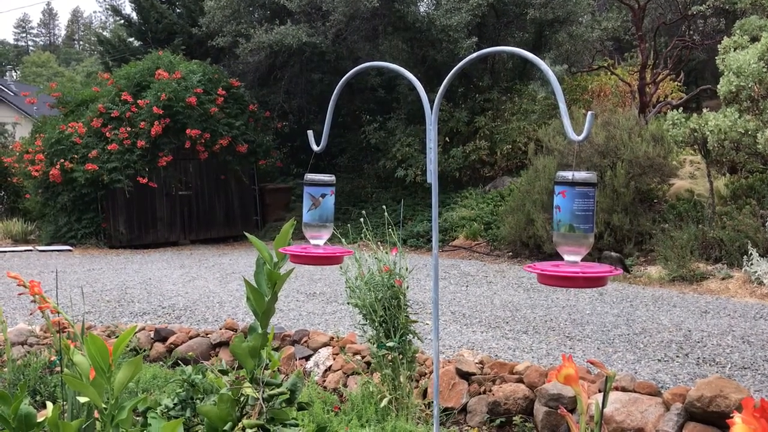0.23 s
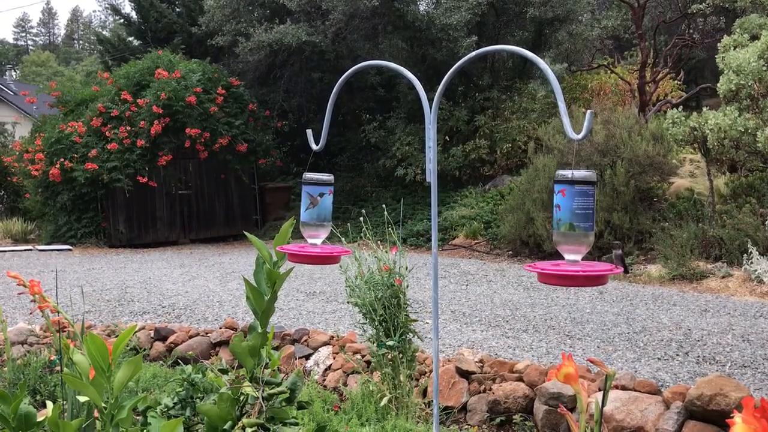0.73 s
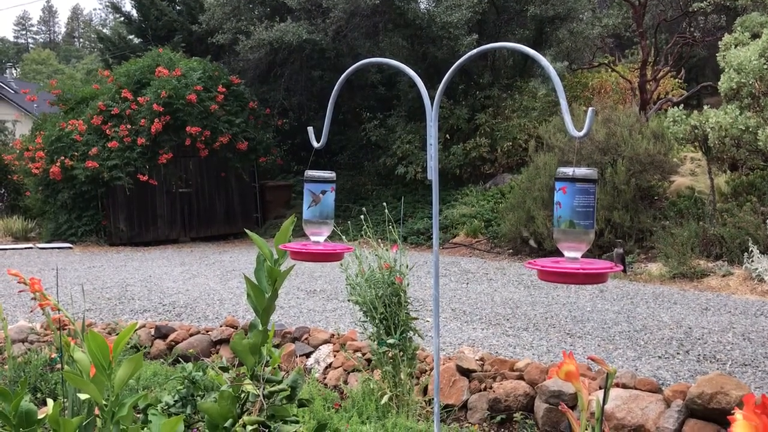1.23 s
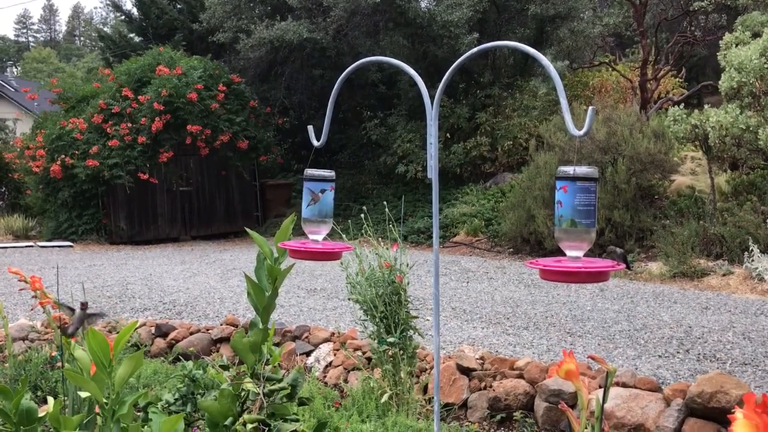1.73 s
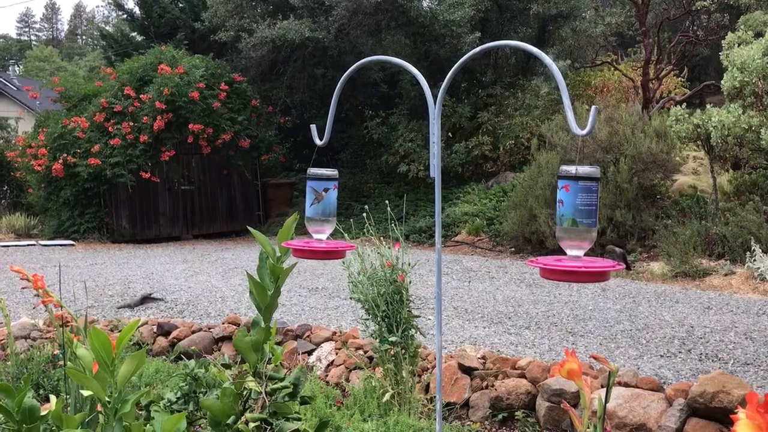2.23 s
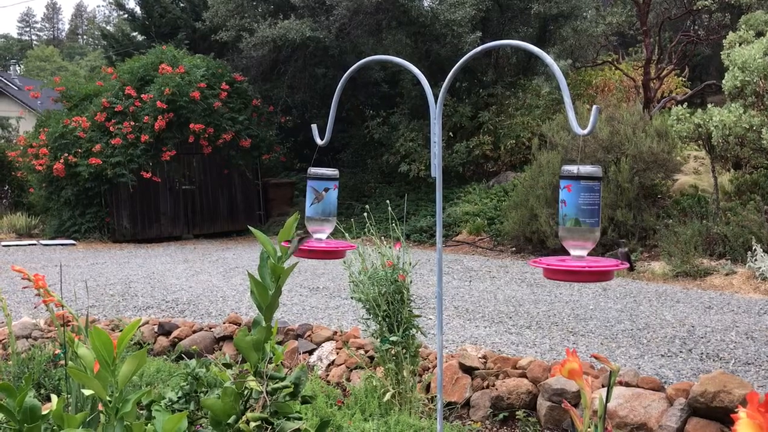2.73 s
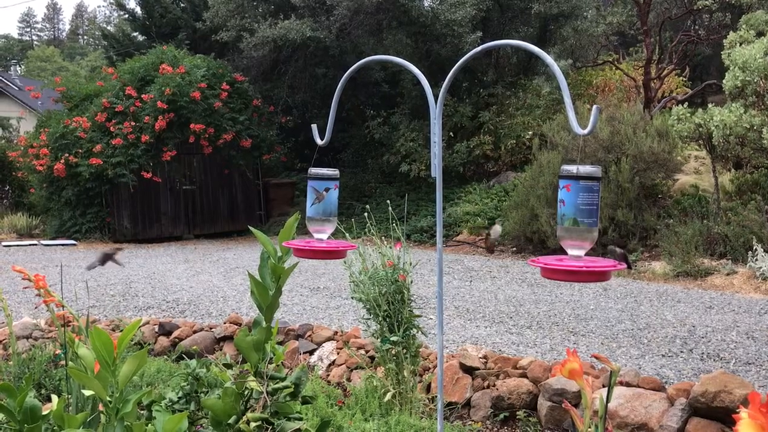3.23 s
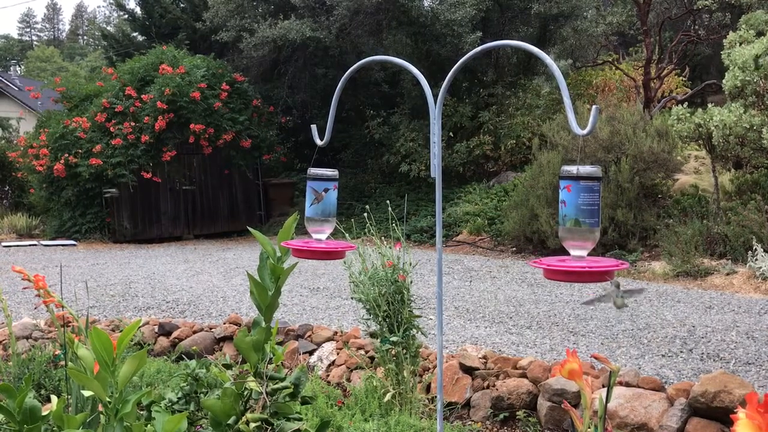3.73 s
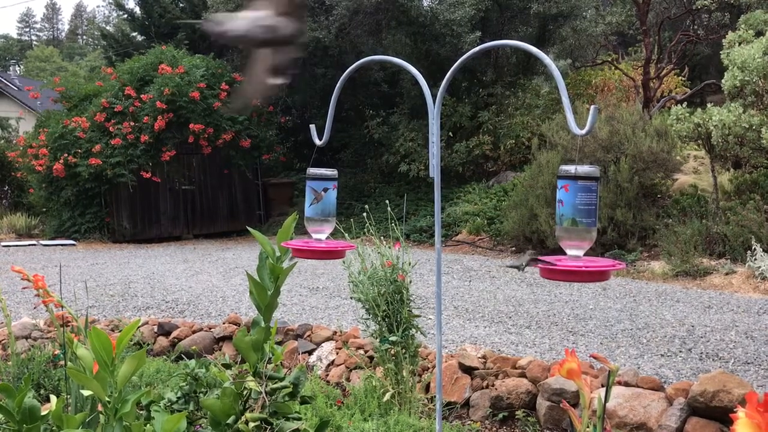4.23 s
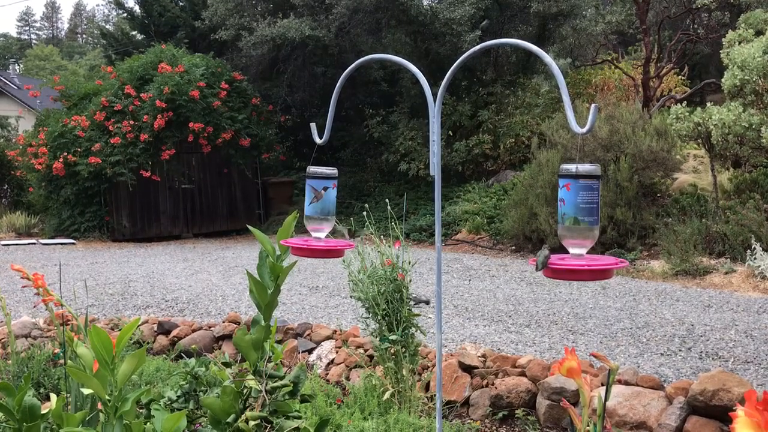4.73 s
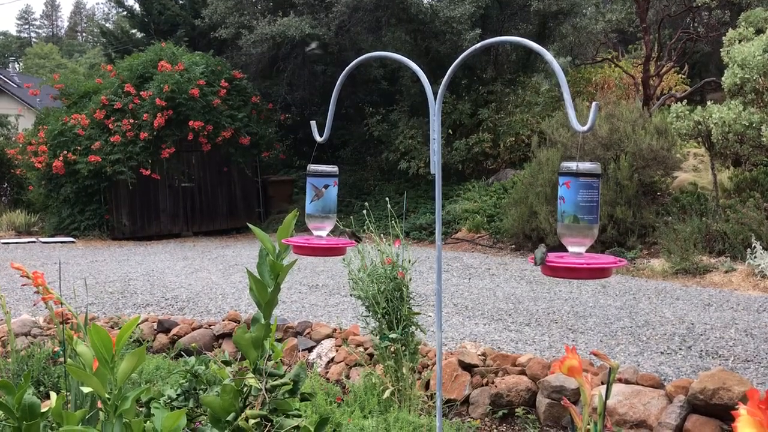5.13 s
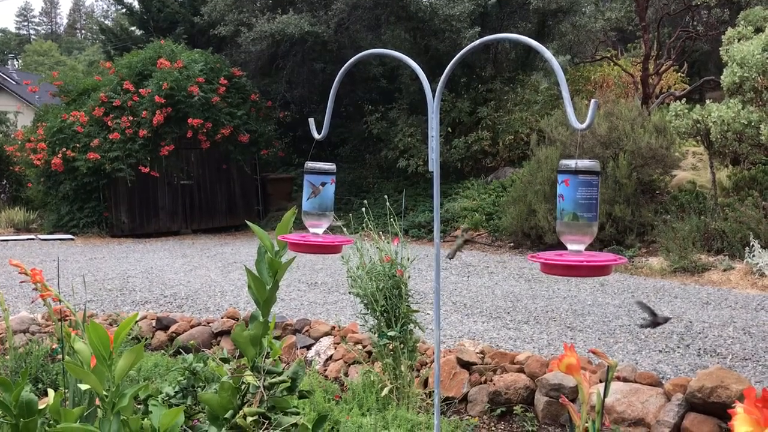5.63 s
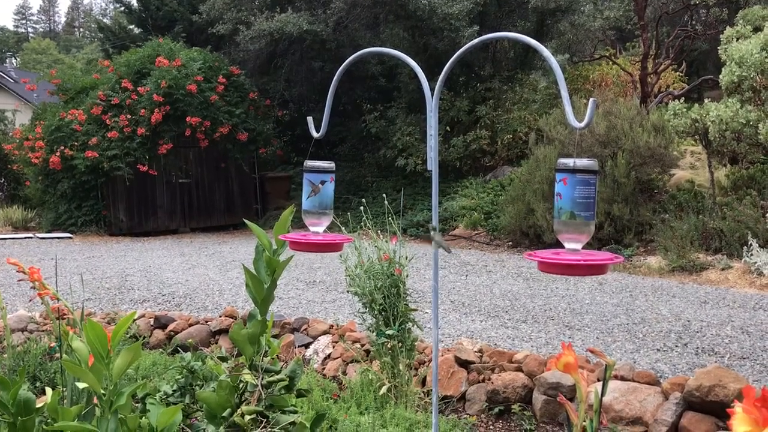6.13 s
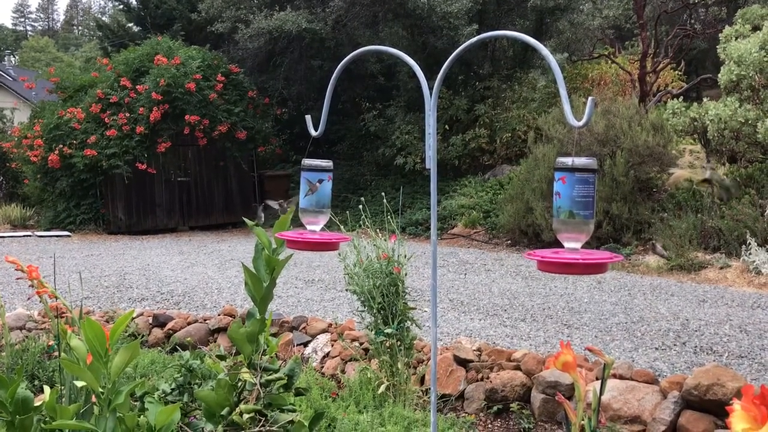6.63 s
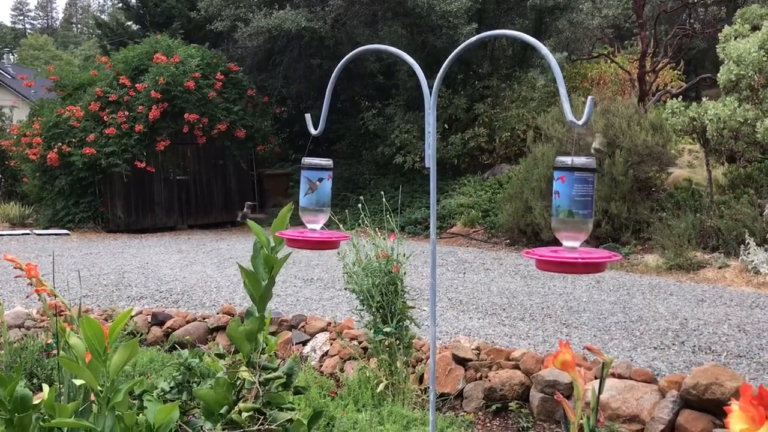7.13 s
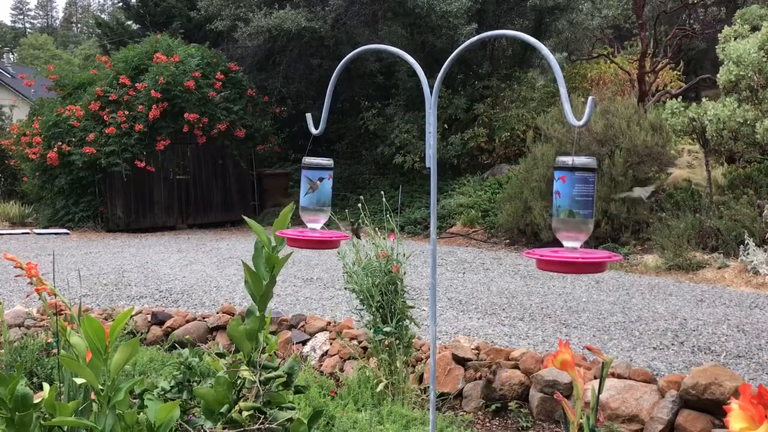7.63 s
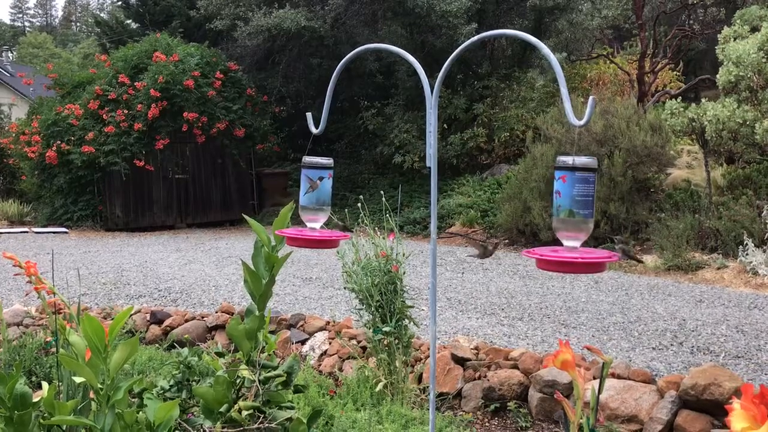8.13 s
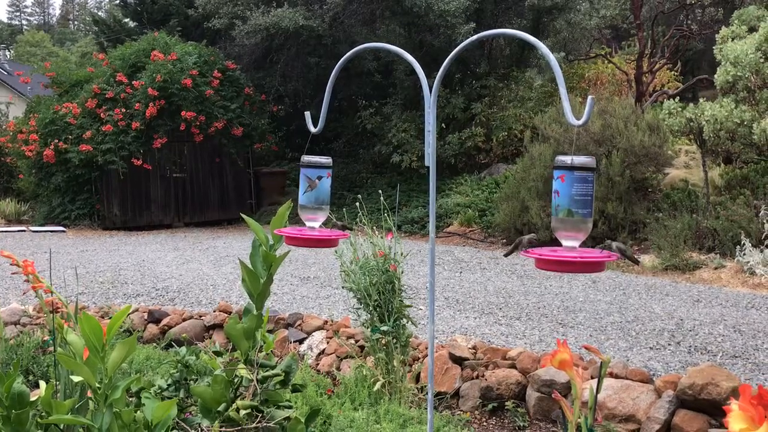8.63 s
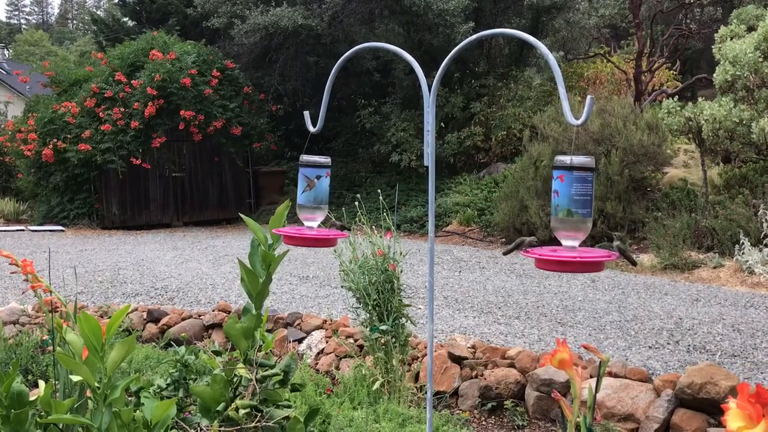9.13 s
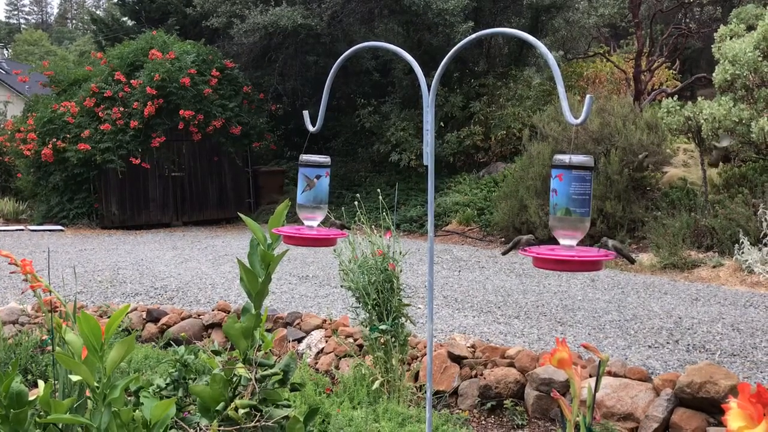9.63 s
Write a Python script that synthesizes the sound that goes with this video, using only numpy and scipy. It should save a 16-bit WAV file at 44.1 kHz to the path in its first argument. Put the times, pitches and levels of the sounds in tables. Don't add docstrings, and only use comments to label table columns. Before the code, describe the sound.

Low wing hum and soft garden air run throughout. A near hummingbird gives a quick series of thin whistles breaking into buzzy warbles, then a farther bird answers in rapid chatter. Wings whirr past closely, strongest just after four seconds, with a sharp chip near five. A rival calls, a bill clatters, and calling fades behind the hedge, leaving wings and a faint insect. Mono outdoor microphone near the feeder.

```python
import sys
import numpy as np
from scipy import signal
from scipy.fft import rfft, irfft, next_fast_len
from scipy.io import wavfile
from scipy.ndimage import map_coordinates

SR = 44100
rng = np.random.default_rng(int(sys.argv[2]) if len(sys.argv) > 2 else 0)


def generate_wav(sig):
    pcm = np.round(np.clip(np.atleast_2d(sig).T, -1, 1) * 32767).astype(np.int16)
    wavfile.write(sys.argv[1], SR, pcm)


def boost(x):
    u = np.asarray(x, float) / 20
    return 10 ** u


N = 436149

# sweeps/Hz, first top f/Hz, last top f/Hz, first bottom f/Hz, last bottom f/Hz,
# rising share/1, level at bottom/dB
FAR_WARBLE = (310, 9200, 7100, 5700, 4400, .58, -9)
# first at/ms, later per warble start/1, gap/ms, second to first bottom/1,
# whistle base f/Hz, whistle rise per bottom rise/1
FAR_DIP_HABIT = (4.0, .37, 30, .9, 8200, .5)


def unit(x):
    return x / np.sqrt(np.mean(x ** 2) + 1e-20)


def along(points, hz):
    f, v = np.transpose(points)
    return np.interp(np.log(hz + 1), np.log(f + 1), v)


def curves(rows):
    s, *cols = np.transpose(rows)
    return [np.interp(np.arange(N) / SR, s, c) for c in cols]


def wobble(rate_hz, size=N):
    knots = rng.standard_normal(size // 20 + 9)
    return map_coordinates(knots, [np.arange(size) * rate_hz / SR])


def filtered(x, response):
    m = next_fast_len(N + 8192)
    return irfft(rfft(x, m) * response(np.fft.rfftfreq(m, 1 / SR)), m)[..., :N]


def noise(spectrum):
    return unit(filtered(rng.standard_normal(N), lambda hz: boost(along(spectrum, hz))))


def add(track, s, sound):
    track[round(s * SR):][:len(sound)] += sound


def rise(t, at_s, soft_s):
    return .5 + .5 * np.tanh((t - at_s) / soft_s)


def garden_air():
    # f/Hz, density/dB
    air_spectrum = [(180, -18), (300, -6.5), (372, -8.5), (555, -10.5), (930, -8), (1010, -9), (1120, -9),
                    (2440, -12.5), (4990, -15), (6000, -18), (10400, -24.5), (14700, -23), (16000, -30)]
    return boost(-68.5) * noise(air_spectrum)


def insect():
    # t/s, level/dB
    insect_level = [
        (4.7, -110),
        (5.0, -84),
        (5.4, -89),
        (7.9, -82),
        (8.3, -91),
        (9.89, -86),
    ]
    level_db, = curves(insect_level)
    band = [(11900, -55), (12250, -12), (12400, -10), (12600, -1), (13000, -65.5)]
    return boost(level_db + 2.0 * wobble(30)) * noise(band)


def hedge(x, leaves_db):
    # f/Hz, t60/s
    hedge_t60 = [(2000, 0.24), (7000, 0.61), (9500, 0.53), (14000, 0.34)]
    hz, t, z = signal.stft(rng.standard_normal(SR // 2), SR, nperseg=256)
    fade = boost(-60 * t / along(hedge_t60, hz)[:, None])
    tail = signal.istft(z * fade, SR, nperseg=256)[1]
    tail *= 1 + boost(leaves_db - 60 * np.arange(len(tail)) / SR / 0.061)
    return signal.fftconvolve(np.pad(x, (60, 0)), tail / np.linalg.norm(tail))[:N]


def echoes(x, taps):
    return sum(boost(db) * np.pad(x, (round(s * SR), 0))[:N] for s, db in taps)


def wall(x):
    early = echoes(x, [(.0021, -22), (.0037, -15), (.0062, -22), (.0115, -22)])
    late = echoes(x, [(.067, -28), (.078, -31)])
    return early + filtered(late, lambda hz: 1 / (1 + (hz / 8600) ** 12))


def flight():
    # t/s, wing beat f/Hz, hum level/dB
    hovering = [(0, 40.7, -64), (1, 41.3, -64), (1.8, 47.3, -61), (2.5, 43.5, -64), (3.1, 39.3, -62.5),
                (3.9, 47.2, -58), (4.6, 40.4, -58), (5.1, 45.7, -58.5), (5.8, 38, -56.5), (6.4, 42.3, -59),
                (7.3, 42.2, -56.5), (7.75, 45, -59), (8.2, 43.5, -61), (8.6, 44, -64), (9.1, 40.2, -64),
                (9.6, 39.4, -67.5), (9.89, 47, -62.5)]
    # t of closest approach/s, hum level/dB, passing time/s, wing beat f/Hz, swish level/dB
    fly_bys = [(0.021, -61, 0.15, 34, -89), (.52, -60.5, 0.045, 42.7, -91), (1.332, -57, .08, 43, -74),
               (1.631, -54.5, 0.07, 43, -71), (3.5, -56, 0.1602, 42, -69.5),
               (3.63, -54.5, 0.083, 47.7, -67), (3.77, -50.5, 0.0998, 48.7, -61.5),
               (4.02, -47.5, 0.045, 46.3, -64), (4.161, -51, 0.073, 55, -61),
               (4.333, -42, 0.0616, 45.5, -58), (4.38, -45.5, 0.022, 42.6, -75),
               (4.87, -57, 0.097, 39, -78), (5.47, -55, 0.11, 41.5, -78), (5.62, -58, 0.0587, 50, -66.5),
               (6.301, -55, 0.066, 46, -73), (6.47, -57, 0.0503, 51, -67.5), (6.6, -60.5, 0.049, 47, -64),
               (6.71, -54, .1, 53, -67), (7.09, -53, 0.072, 44.3, -69), (7.85, -58, 0.047, 48, -73),
               (8.929, -54, 0.083, 43, -72.5), (9.31, -53.5, 0.064, 41.5, -72.5),
               (9.759, -54.5, 0.067, 51, -69)]
    beat_hz, hover_db = curves(hovering)
    s, hum_db, pass_s, pass_beat_hz, swish_db = np.transpose(fly_bys)[:, :, None]
    t = np.arange(0, N + 64, 64) / SR
    near = (1 + ((t - s) / pass_s) ** 2) ** -2.2

    def passing_sum(v):
        return np.interp(np.arange(N) / SR, t, (v * near).sum(0))

    hover_power = boost(2 * hover_db)
    power = hover_power + passing_sum(boost(2 * hum_db))
    beat_hz = (beat_hz * hover_power + passing_sum(pass_beat_hz * boost(2 * hum_db))) / power
    swish_power = boost(2 * (hover_db - 14.5)) + passing_sum(boost(2 * swish_db))
    return beat_hz, np.sqrt(power), np.sqrt(swish_power)


def wings():
    # multiple of the beat/1, level/dB
    beat_harmonics = [(1, -4), (2, 2), (3, -9), (4, -2.5), (5, -10), (6, -13), (7, -14.5), (8, -13),
                      (9, -15.5), (10, -24)]
    # f/Hz, density/dB
    draught_spectrum = [(15, -45.5), (25, -8.5), (86, -1.5), (189, -7), (223, -9), (344, -15), (700, -33),
                        (910, -78), (1540, -120)]
    feather_spectrum = [(300, -32), (600, -4), (1500, -9.0), (3000, -12.5), (6000, -13.5), (15000, -20.0)]
    beat_hz, strength, swish = flight()
    turn = 2 * np.pi * np.cumsum(beat_hz * (1 + 0.01446 * wobble(12))) / SR
    tone = sum(boost(db + 2.57 * wobble(8)) * np.sin(k * turn + rng.uniform(0, 3.83))
               for k, db in beat_harmonics)
    puffs = boost(3.34 * np.cos(2 * turn) + 2.3 * np.cos(turn))
    hum = boost(-1.5) * (strength / boost(-57.5)) ** 0.098 * unit(tone)
    hum += boost(-2.5) * unit(puffs * noise(draught_spectrum))
    feathers = unit(puffs * noise(feather_spectrum))
    return strength * boost(0.83 * wobble(7)) * hum + swish * feathers


def clicks():
    # t/s, peak level/dB, thump level/dB
    snaps = [(.737, -48.5, -22), (1.1383, -52, -20), (1.786, -50, -33), (3.617, -52.5, 5),
             (5.514, -48, -20), (6.31, -43, -29), (6.553, -50, 2), (6.6064, -56, 3), (6.6125, -30, -30),
             (6.617, -37, -15), (6.632, -52, -11), (6.657, -47, -10), (6.670, -46, -24), (6.677, -49, -17),
             (9.70, -62, -2)]
    out, t = np.zeros(N), np.arange(SR // 50) / SR
    for s, db, thump_db in snaps:
        snap = boost(-60 * t / 0.00072) * np.sin(2 * np.pi * 6800 * t)
        snap += boost(-16.5 - 60 * t / 0.017) * rng.standard_normal(len(t))
        thump = boost(thump_db - 60 * t / 0.0049) * np.sin(2 * np.pi * 1100 * t)
        add(out, s, boost(db + 6.5) * (snap + thump))
    return out


def syrinx(pitch_hz, second_db, third_db, rasp):
    # f/Hz, level/dB
    throat = [(1200, -8.5), (2500, -8.5), (4000, -6.5), (6000, 1.5), (9300, 0.5), (10600, 0), (12500, -4.5),
              (16000, -16)]
    turn = 2 * np.pi * np.cumsum(pitch_hz) / SR
    smear = rasp * wobble(1400, size=len(pitch_hz))
    out = 0
    for k, db in ((1, 0), (2, second_db), (3, third_db)):
        level = boost(db + along(throat, k * pitch_hz)) * (k * pitch_hz < SR / 2)
        out = out + level * np.sin(k * turn + (k - 1) * smear)
    return out


def chips():
    # t/s, level/dB, top f/Hz, length/ms
    falls = [
        (2.628, -48, 7500, 11.38),
        (4.989, -30, 7830, 14.1),
        (7.5772, -34.5, 7685, 14),
        (7.848, -32.5, 8500, 10.3),
        (8.251, -60, 8540, 16),
        (8.567, -41, 7800, 12.1),
    ]
    out, t = np.zeros(N), np.arange(SR // 40) / SR
    for s, db, hz, length_ms in falls:
        done = np.clip(t / (length_ms / 1000), 0, 1)
        pitch_hz = hz - (hz - 1250) * (np.clip(done - .2, 0, 1) / .8) ** 2.1
        shape = done ** 2.2 * (1 - done) ** 0.86
        add(out, s, boost(db + 13.0) * shape * syrinx(pitch_hz, second_db=-1.0, third_db=1, rasp=0.082))
    return out


def warble(t, start_s, end_s, habit, unsteady, sag, sag_s, peak=0.71, droop=1.4):
    rate_hz, top0, top1, low0, low1, rising, fall_db = habit
    size = len(t)
    done = np.clip((t - start_s) / max(end_s - start_s, 1e-3), 0, 1)
    sagging = rise(t, end_s - sag_s, 0.00162)
    speed_hz = rate_hz * (1 + unsteady * wobble(146.3, size)) * (1 - 0.279 * sagging)
    cycle = (rising + np.cumsum(speed_hz * (t > start_s)) / SR) % 1
    swing = np.where(cycle < rising, cycle / rising, 1 + (cycle - rising) / (1 - rising))
    low_hz = low0 + (low1 - low0) * done
    top_hz = top0 + (top1 - top0) * done ** droop
    pitch_hz = low_hz + (top_hz - low_hz) * np.abs(np.sin(np.pi * swing / 2)) ** 1.4
    pitch_hz *= 1 + 0.0252 * wobble(498.4, size)
    pitch_hz *= 1 - sag * sagging * (.9 + 0.338 * np.tanh(wobble(900, size)))
    push = .5 + .5 * np.cos(2 * np.pi * (cycle - peak * rising))
    gain_db = fall_db * (1 - push) * (1 - 0.66 * sagging) - 4.5 * sagging
    return pitch_hz, boost(gain_db + 1.13 * wobble(598.0, size))


def bursts(table, rate_hz, ratios, rising, fall_db, swell_db, second_db, sag, peak, droop=1.4, hiss_db=-14):
    out, t = np.zeros(N), np.arange(SR // 10) / SR
    for s, db, hz, length_ms in table:
        end_s = length_ms / 1000 + 0.0023
        habit = (rate_hz, *(hz * np.array(ratios)), rising, fall_db)
        own_sag = sag * np.interp(hz, [5900, 6200], [1, .45])
        pitch_hz, gain = warble(t, 0, end_s, habit, unsteady=0.0318, sag=own_sag, sag_s=0.0072,
                                peak=peak, droop=droop)
        shape = boost(db + 10.5 - swell_db * np.clip(1 - t / end_s, 0, 1))
        shape *= rise(t, 0.0014, .0005) * (1 - rise(t, end_s, 0.0017))
        add(out, s, shape * gain * syrinx(pitch_hz, second_db, second_db + 4, rasp=2.37))
        puff = np.exp(-((t - end_s + .0045) / 0.0025) ** 2)
        puff += 0.33 * np.exp(-((t - .001) / .0007) ** 2)
        add(out, s, boost(db + hiss_db) * puff * np.diff(rng.standard_normal(len(t) + 1)))
    return out


def rattles():
    # t/s, level/dB, top f/Hz, length/ms
    slow = [(4.245, -70, 6600, 116), (6.882, -66.5, 7000, 39), (8.55, -68, 6970, 63.4),
            (3.588, -45, 7500, 59), (3.697, -46.5, 7490, 23), (3.8545, -42.5, 7830, 66),
            (3.943, -48.5, 7390, 61), (5.577, -55, 6053, 37), (6.308, -59.5, 6440, 20.8),
            (6.476, -58.5, 6560, 56)]
    return bursts(slow, 164, (0.84, 0.96, 0.18, .25), rising=0.44, fall_db=-22, swell_db=9,
                  second_db=-3.5, sag=0.093, peak=0.59)


def trills():
    # t/s, level/dB, f/Hz, length/ms
    near_trills = [
        (1.3633, -49, 5700, 24),
        (1.5293, -42.5, 5690, 26.2),
        (1.7019, -42.5, 5590, 24.4),
        (1.8866, -44.5, 5725, 18.5),
                   (3.426, -53, 5520, 25),
    ]
    return bursts(near_trills, 345, (1.03, 1.2, 0.96, 0.88), droop=0.59, hiss_db=-7.0,
                  rising=0.49, fall_db=-14, swell_db=8, second_db=-5.0, sag=.54, peak=0.78)


def calls(table, habit, crest_hz, slide, second_db, droop, warble_db, opening_db=0, peak=0.48, end_db=5.5,
          dull_db=-2.0):
    out, t = np.zeros(N), np.arange(SR // 10) / SR
    size = len(t)
    for s, db, hz, start_ms, length_ms, drops in table:
        start_s, end_s = start_ms / 1000, length_ms / 1000 + 0.00515
        dips = [(at_ms / 1000, low_hz, ms / 1000) for at_ms, low_hz, ms in drops]
        first_s = dips[0][0] if dips else 1
        whistle_hz = hz + (crest_hz - hz) * rise(t, first_s, .001)
        whistle_hz *= 1 + 0.019 * wobble(253, size)
        whistle_hz *= 1 + slide * (.3 - np.exp(-t / 0.0014)) * (t < first_s)
        for at_s, low_hz, width_s in dips:
            dip = np.cos(np.pi / 2 * np.clip((t - at_s) / (1.1 * width_s), -1, 1)) ** 2
            whistle_hz -= (whistle_hz - low_hz) * dip
        pitch_hz, gain = warble(t, start_s, end_s, habit, unsteady=.08, sag=0.35, sag_s=0.00502,
                                peak=peak, droop=droop)
        mix = rise(t, start_s, 0.00069)
        whistle_db = db + 4.0 + opening_db * np.exp(-t / 0.0029) + 2.8 * wobble(295, size)
        level = (1 - mix) * boost(whistle_db) + mix * boost(db + warble_db + 5.5) * gain
        level *= boost(dull_db * (1 - mix) * (crest_hz - whistle_hz) / 4000)
        level *= (1 - np.exp(-t / 0.0014)) * (1 - rise(t, end_s - .004, 0.004))
        overtone_db = second_db - 1.2 * mix + end_db * rise(t, end_s - .009, 0.0038)
        voice_hz = (1 - mix) * whistle_hz + mix * pitch_hz
        add(out, s, level * syrinx(voice_hz, overtone_db, overtone_db - 1, rasp=3.2 * mix))
        lead_in = np.sin(np.cumsum(np.linspace(3500, 8500, 130)) * 2 * np.pi / SR)
        add(out, s - .003, boost(db - 18.5) * np.hanning(130) * lead_in)
    return out


def dipped(table, habit):
    first_ms, later, gap_ms, ratio, base_hz, follow = habit
    rows = []
    for s, db, low_hz, start_ms, length_ms in table:
        at_ms = first_ms + later * start_ms
        dips = [(at_ms, low_hz, 4.1), (at_ms + gap_ms, ratio * low_hz, 3.6)]
        dips = [d for d in dips if d[0] < start_ms + 1.2]
        rows.append((s, db, base_hz + follow * (low_hz - 5000), start_ms, length_ms, dips))
    return rows


def held(table):
    # t of bottom/s, bottom f/Hz, width/ms
    whistle_dips = [(1.9866, 8500, 3.4), (1.994, 5930, 1.7), (2.109, 8100, 3.1), (2.2424, 6200, 4.0),
                    (2.2614, 6570, 4.7), (3.391, 8970, 5.2), (3.3978, 8100, 3.14), (3.402, 5740, 0.8),
                    (3.408, 3920, 5.74), (3.128, 5050, 5.3), (3.136, 5210, 4.6), (3.256, 5120, 4.1),
                    (3.598, 5760, 5.4),
                    (1.0232, 6560, 2.5), (1.027, 5370, 1.7), (1.151, 6700, 4.2), (1.159, 6440, 2.9),
                 (1.1617, 6480, 2), (1.289, 6130, 3.1), (1.2968, 5780, 2), (1.448, 7500, 2.3),
                 (1.456, 5250, 5.4), (1.4615, 5600, 2), (1.6202, 5400, 4.9), (1.6298, 4180, 2.9),
                 (1.7906, 7830, 2.6), (1.798, 5220, 4.9), (1.8072, 4240, 3.5), (6.2086, 7750, 2.5),
                 (6.213, 6220, 2.44),
                    (5.5222, 8900, 1.5), (5.5253, 7204, 1.6), (5.626, 6270, 3.4), (5.6327, 5680, 3),
                  (5.635, 5600, 1.5), (5.7304, 5300, 3.8), (5.736, 6877, 2.5), (5.7396, 5000, 2.6),
                  (5.841, 5210, 5.3), (5.945, 5977, 5.6), (5.949, 5890, 2.36), (5.953, 5800, 2.08),
                  (6.9615, 8870, 1.89), (7.0714, 6600, 2.93), (7.176, 5230, 2.6), (7.185, 5360, 4.9),
                  (7.292, 5150, 2.5), (7.300, 5425, 3.4), (7.406, 4580, 3.9), (7.4136, 6400, 2.8),
                  (7.417, 4470, 3.5)]
    every = whistle_dips
    rows = []
    for row in table:
        dips = [(1000 * (at - row[0]), low, ms) for at, low, ms in every if 0 < at - row[0] < .08]
        rows.append((*row, dips))
    return rows


def leaving_bird():
    # t/s, level/dB, first dip bottom f/Hz, warble start/ms, length/ms
    departing = [
        (2.953, -62, 5670, 0.76, 38.3),
        (7.599, -54, 5730, 0.93, 44.56),
        (7.7738, -55, 5785, 15.3, 51),
        (7.9495, -56.5, 5925, 14.6, 51.9),
        (8.143, -61.5, 5690, 1.01, 58.13),
        (8.344, -62.5, 5710, 1.37, 49.4),
    ]
    return calls(dipped(departing, FAR_DIP_HABIT), FAR_WARBLE, crest_hz=9400, slide=.03, second_db=-1.5,
                 droop=2.1, warble_db=-2.0)


def far_bird():
    # t/s, level/dB, whistle f/Hz, warble start/ms, length/ms
    long_whistles = [
        (1.927, -59.5, 9650, 61.8, 68),
        (2.0817, -56.5, 9250, 38.5, 67),
        (2.2353, -56, 8600, 34.97, 71),
        (7.003, -51, 9050, 44.5, 14),
        (7.966, -70, 9100, 70.2, 33),
    ]
    # t/s, level/dB, first dip bottom f/Hz, warble start/ms, length/ms
    answers = [
        (2.4406, -55.5, 5795, 18, 50.2),
        (2.6127, -54, 6480, 20, 41),
        (2.8251, -53.5, 6450, 15, 53.7),
        (2.9971, -54, 5500, 18, 57.5),
        (3.7769, -43.5, 5940, 15.3, 47.3),
        (3.9558, -52, 5766, 18.1, 48.8),
        (4.1323, -49.5, 5440, 14.2, 45.42),
        (4.3856, -49, 5376, 13.5, 52.4),
        (4.5601, -50.5, 5366, 16.3, 55.95),
        (4.7517, -53, 5150, 15, 49.57),
    ]
    # t/s, level/dB, whistle f/Hz, warble start/ms, length/ms
    faltering = [
        (3.1195, -53.5, 8050, 45, 13),
        (3.2452, -49.5, 8250, 16, 34),
        (3.5853, -44.5, 8720, 19, 49),
    ]
    # t/s, level/dB, f/Hz, length/ms
    distant_trills = [(2.366, -61.5, 6570, 26.7), (2.5447, -60, 6570, 22), (2.699, -72, 6295, 26),
                      (2.9171, -57.5, 6635, 27.6), (3.6996, -48, 6700, 16), (4.052, -55, 6420, 23),
                      (4.219, -55, 6316, 26), (4.299, -57, 6360, 29), (4.4848, -52, 6630, 17),
                      (4.669, -59.5, 6120, 23), (7.5225, -59, 6890, 23), (7.696, -61, 6670, 30),
                      (7.871, -61, 6600, 32), (8.054, -69, 6360, 25.7), (8.234, -68, 6535, 28),
                      (8.419, -68.5, 6760, 27.6)]
    out = calls(held(long_whistles), FAR_WARBLE, crest_hz=9600, slide=-0.0355, second_db=-4.0,
                droop=0.98, warble_db=-2.0)
    out += calls(dipped(answers, FAR_DIP_HABIT), FAR_WARBLE, crest_hz=9450, slide=-0.012, second_db=-4.5,
                 droop=1.0, warble_db=-3.0)
    out += calls(held(faltering), FAR_WARBLE, crest_hz=9740, slide=0.052, second_db=-2.5,
                 droop=0.8, warble_db=-11.5)
    out += bursts(distant_trills, 345.6, (1.07, 1.09, 0.82, 0.76), rising=0.39, fall_db=-22, swell_db=3.5,
                  second_db=-1.5, sag=0.138, peak=0.91)
    return out


def rival_away():
    # t/s, level/dB, whistle f/Hz, warble start/ms, length/ms
    turned = [
        (6.9575, -50, 9300, 7.5, 45),
        (7.0644, -43.5, 9400, 10.1, 43.8),
        (7.1696, -42.5, 9100, 20.2, 43.47),
        (7.2841, -44, 9000, 18, 48.3),
        (7.3986, -44, 9000, 22, 49.6),
    ]
    # sweeps/Hz, first top f/Hz, last top f/Hz, first bottom f/Hz, last bottom f/Hz,
    # rising share/1, level at bottom/dB
    away_habit = (345, 9300, 8000, 6200, 5000, .5, -21)
    return calls(held(turned), away_habit, peak=0.78, crest_hz=9600, slide=0.15, end_db=13, dull_db=-2.0,
                 second_db=-7, droop=1.317, warble_db=5.0, opening_db=8.0)


def rival():
    # t/s, level/dB, whistle f/Hz, warble start/ms, length/ms
    challenge = [
        (5.4176, -45, 9400, 2, 45.7),
        (5.5163, -42, 9900, 11.2, 45.05),
        (5.6172, -44.5, 9400, 20.7, 47.17),
        (5.7234, -44, 9600, 19, 46),
        (5.8325, -44, 9300, 11.7, 46.5),
        (5.9365, -45, 8700, 18.2, 42.8),
    ]
    # sweeps/Hz, first top f/Hz, last top f/Hz, first bottom f/Hz, last bottom f/Hz,
    # rising share/1, level at bottom/dB
    rival_habit = (350, 9700, 8100, 6100, 5100, .42, -16)
    return calls(held(challenge), rival_habit, peak=0.73, crest_hz=10030, slide=0.13, second_db=-4.5,
                 droop=1.8, warble_db=4.0, opening_db=1)


def near_bird():
    # t/s, level/dB, whistle f/Hz, warble start/ms, length/ms
    near_calls = [
        (1.0073, -45, 9870, 22.1, 49.5),
        (3.3787, -37, 9270, 61, 29),
                  (1.142, -42.5, 10400, 26, 50),
        (1.279, -43, 9000, 19.2, 44),
        (1.444, -37, 8150, 20.4, 41),
        (1.6116, -37, 8500, 19, 45),
        (1.789, -35.5, 8470, 20, 40.4),
    ]
    # t/s, level/dB, whistle f/Hz, warble start/ms, length/ms
    plunge = [
        (6.187, -40.5, 8950, 27.4, 62.7),
    ]
    # sweeps/Hz, first top f/Hz, last top f/Hz, first bottom f/Hz, last bottom f/Hz,
    # rising share/1, level at bottom/dB
    near_habit = (310, 8500, 7100, 5200, 3500, .58, -11)
    deep_habit = (305, 8600, 6900, 5000, 2900, .55, -13)
    out = calls(held(near_calls), near_habit, crest_hz=9600, slide=0.0979, second_db=-5.5,
                droop=0.484, warble_db=-1.5, opening_db=-14.0)
    out += calls(held(plunge), deep_habit, peak=0.83, crest_hz=9300, slide=0.064, second_db=-1.0,
                 droop=0.46, warble_db=-2.0, opening_db=-9)
    return out


def scene():
    close = near_bird() + rival() + trills() + rattles() + chips() + clicks()
    away = rival_away()
    far = far_bird()
    hidden = leaving_bird()
    direct = close + far + away + boost(-1.5) * hidden
    birds = direct + wall(direct)
    birds += boost(-6.0) * hedge(away, leaves_db=16.5)
    birds += boost(-4.5) * hedge(hidden, leaves_db=1)
    birds += boost(-11.5) * hedge(close, leaves_db=20.5)
    birds += boost(-5.0) * hedge(far, leaves_db=8)
    return np.tile(birds + wings() + garden_air() + insect(), (2, 1))


def top_cut(x):
    return signal.sosfilt(signal.butter(12, 16480, fs=SR, output="sos"), x)


def record(dry):
    def microphone(hz):
        notch = boost(-3.5 * np.exp(-((hz - 10600) / 450) ** 2))
        return (hz < 15900) * notch / (1 + (39 / (hz + 1)) ** 7)

    return top_cut(filtered(dry, microphone))


dry = scene()
out = record(dry)
generate_wav(out)
```